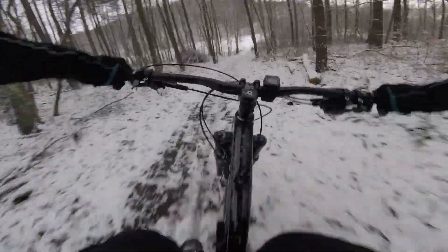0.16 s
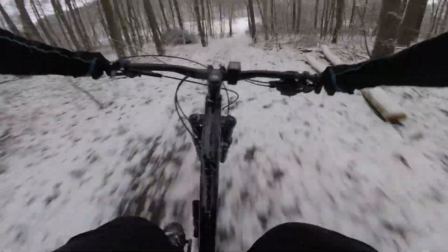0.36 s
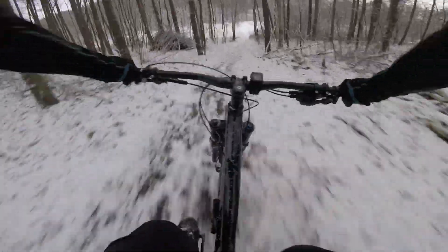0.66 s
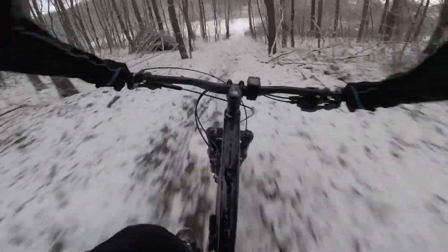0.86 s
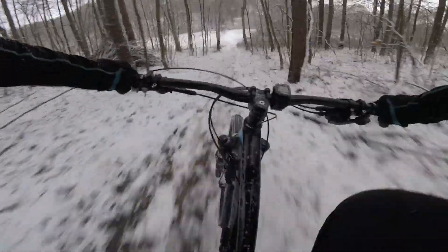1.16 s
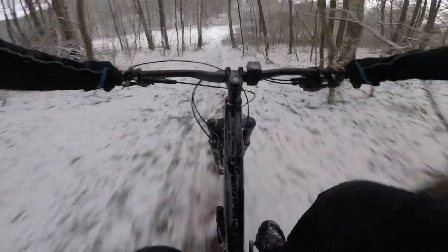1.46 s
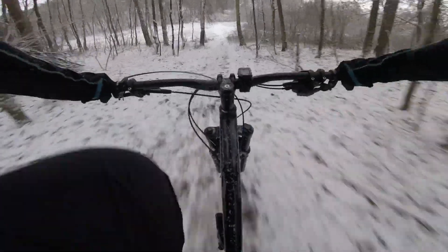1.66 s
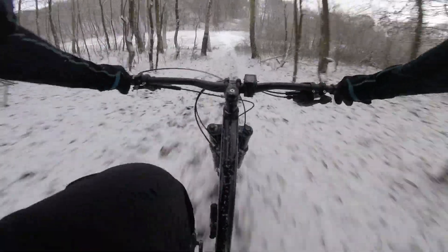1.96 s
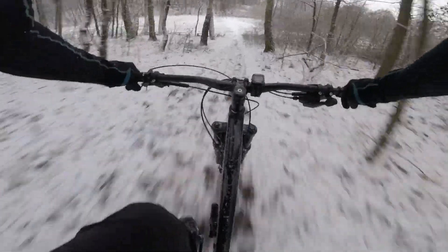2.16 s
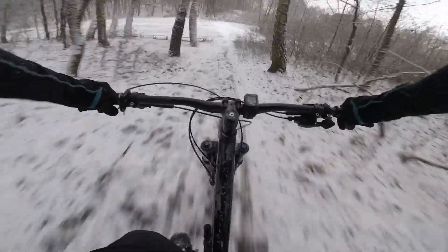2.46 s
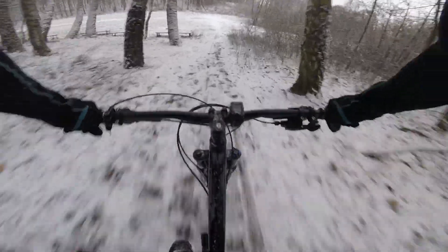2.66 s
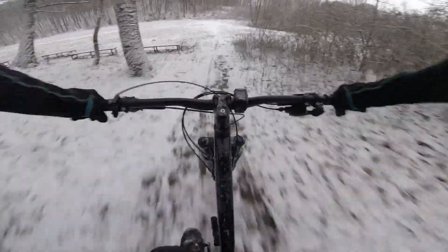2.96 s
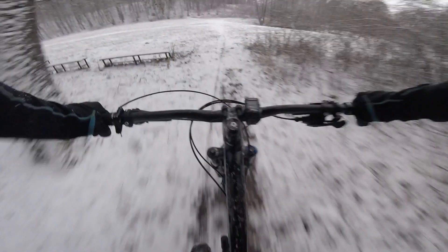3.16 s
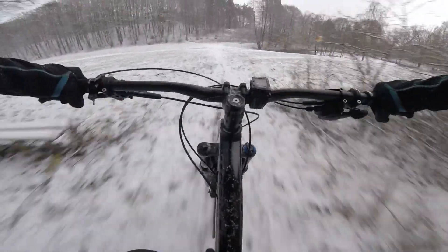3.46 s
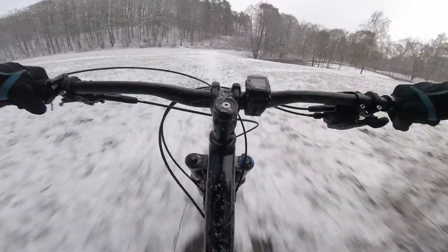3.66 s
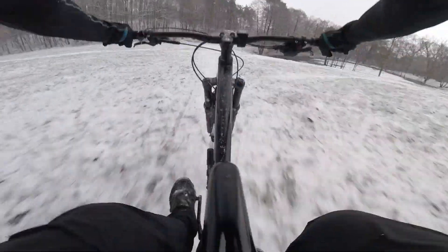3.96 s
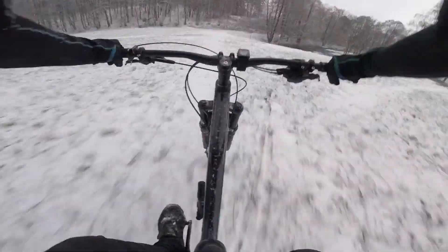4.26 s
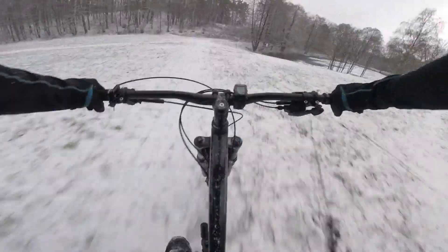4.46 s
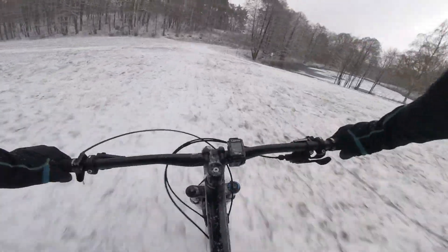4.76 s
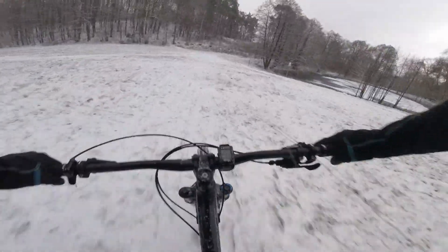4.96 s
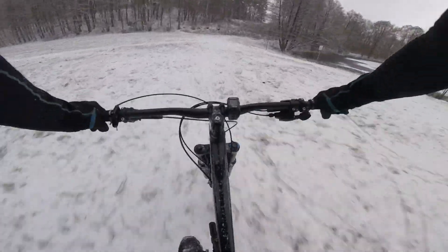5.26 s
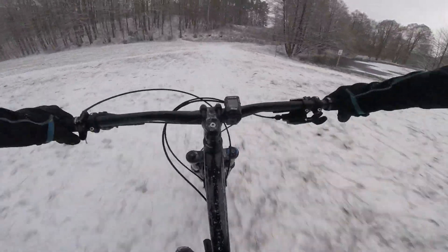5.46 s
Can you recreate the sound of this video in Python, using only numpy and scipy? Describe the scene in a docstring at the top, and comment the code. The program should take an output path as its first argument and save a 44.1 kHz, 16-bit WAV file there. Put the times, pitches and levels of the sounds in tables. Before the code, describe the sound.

Muffled wind buffeting and deep tyre rumble on fast, bumpy snow, with bright chain ticks, dry frame knocks and crackling crust.

```python
"""A mountain bike runs fast down a snowy forest trail, heard from a microphone on the rider's chest.
From the start wind turbulence buffets, tyres rumble and crunch (shaped noise and random grains), and
chain and cables tick (struck resonances near 6.5 kHz). Soon crust crackles, the frame knocks, and single
eddies thump as swings of pressure; from 0.4 s short hollow pops ring low as struck resonances.
Near 1.1, 3.2 and 5.1 s a twig scrapes by stick and slip. The heaviest eddy comes at 2.6 s."""
import sys
import numpy as np
from scipy import signal
from scipy.io import wavfile
from scipy.ndimage import uniform_filter1d

SR = 44100
rng = np.random.default_rng(int(sys.argv[2]) if len(sys.argv) > 2 else 0)


def unload_wav(signal):
    """Save mono or channel-first audio to the path in sys.argv[1] as 16-bit WAV at rate SR, clipped to [-1, 1]."""
    wavfile.write(
        sys.argv[1],
        SR,
        np.round(np.clip(np.atleast_2d(signal).T, -1, 1) * 32767).astype(np.int16),
    )


N = 246959  # length in samples

# Load of the tyres on the trail. Each row: time in seconds, load in dB.
TYRE_LOAD = [(0.0, -17.5), (0.15, -20), (0.48, -20), (1.0, -18.5), (1.65, -16), (1.82, -18), (2.2, -15),
             (2.68, -14), (2.95, -17), (3.1, -18), (3.45, -19.5), (3.96, -22), (4.15, -14.5), (4.4, -15),
             (4.57, -21.5), (4.96, -21), (5.16, -18.5), (5.42, -20), (5.6, -23.5)]
MEAN_LOAD_DB = -18
# Layers that follow the load. Each holds: level at the mean load in dB, slope in dB per dB of load.
WIND_BUFFETING = (-20, .6)
TYRE_RUMBLE = (-20.5, 0.91)
SNOW_CRUNCH = (-47, 0.5)

# Air rushing past the microphone. Each row: time in seconds, level in dB.
AIR_RUSH = [(0, -29), (.4, -34), (1.0, -32.5), (1.65, -31.5), (1.85, -34.5), (2.45, -29.5), (2.78, -28.5),
            (2.87, -31), (3.15, -31), (3.5, -33.5), (3.92, -34), (4.14, -37.5), (4.42, -32), (4.58, -35.5),
            (4.95, -32.5), (5.35, -32.5), (5.6, -36)]
# Passing gusts. Each row: centre in seconds, length in seconds, change of the buffeting in dB.
GUSTS = [(.6, 1, 3.5), (1.504, 0.079, 4), (2.005, 0.25, 3), (2.237, 0.16, -1), (2.738, 0.29, 4),
         (3.134, 0.15, 4.5), (3.762, 0.17, 5.5), (4.173, 0.095, 1), (4.483, .12, 3), (5.374, 0.49, 3)]
# Brief changes of wind, mostly lulls. Each row: centre in seconds, length in seconds, change in dB.
LULLS = [(0.145, 0.068, -2), (0.935, .05, -3.5), (1.12, 0.071, -3.5), (1.23, .04, 2), (2.4, 0.063, -7),
         (2.89, 0.086, -4), (3.36, 0.083, -5), (3.62, 0.051, -7), (3.995, .05, -8), (4.3, 0.068, -2),
         (4.79, 0.064, -1.5), (5.0, .06, -8.5)]
# Spectra of large and small eddies. Each row: frequency in Hz, relative density in dB per Hz.
EDDY_SPECTRUM = [(16, -11), (25, 2.5), (40, -1), (70, -4), (110, -5.5), (170, -14.5), (300, -34.5)]
RUSH_SPECTRUM = [(250, -2.5), (480, 2.5), (650, -1), (1000, -8.5), (1500, -18.5), (2200, -23), (3200, -29),
                 (4500, -59.5)]
RUSH_JOLT_SHARE = 0.44  # share of a jolt, in dB, that the rush of air takes on
MUFFLE_HZ = 3620  # low-pass for wind, rolling and low pops

# Bumps that press the bike down. Each row: centre in seconds, change of the rumble in dB.
BUMPS = [(.07, 4), (.15, 3.5), (0.224, 5.5), (.3, -0.5), (.375, 5), (.631, 6.5), (.78, 3.5), (1.006, 7.5),
         (1.23, 1), (1.32, 2.5), (1.75, 3), (2.3, -1.5), (2.72, 2.5), (2.79, 1), (3.125, 5.5), (3.18, 2),
         (3.306, 3.5), (3.66, 4), (3.77, 6.5), (4.2, 1), (4.39, 4), (4.73, 5), (5.149, 4), (5.28, 2)]
# hump length; time from the bump to the smaller opposite hump that follows it; relative size of that hump
BUMP_S, REBOUND_S, REBOUND_SHARE = 0.084, 0.063, 0.23
# Brief losses of grip. Each row: centre in seconds, length in seconds, change of the rumble in dB.
SKIPS = [(.425, 0.027, -2.5), (0.693, .04, -4), (1.82, 0.11, -2), (2.83, .04, -1.5), (3.263, .035, -6.5),
         (3.888, 0.062, -6), (4.275, 0.018, -7)]
# Ground hardness. Each row: time in seconds, hardness on a scale where a step is 1.7 dB of roar over thud.
GROUND_HARDNESS = [(0, 2.5), (.65, 1), (1.25, 6.5), (1.9, -1), (2.5, 5.5), (3.1, -2), (3.5, 1), (4.0, -1.5),
                   (4.3, 0), (4.7, -2), (5.35, 3), (5.6, 5)]
BUMP_DEEPENING = 0.36  # hardness lost per dB of jolt
# Spectra on soft and hard ground. Each row: frequency in Hz, relative density in dB per Hz.
THUD_SPECTRUM = [(60, -2), (110, -5), (190, -0.5), (260, -5.5), (360, -21.5), (600, -43.5)]
ROAR_SPECTRUM = [(180, -6), (260, -2), (360, -2.5), (500, -10.5), (720, -28), (1400, -64)]

# Loose snow thrown against the bike. Each row: time in seconds, spray level in dB.
SNOW_SPRAY = [(0, -39), (.09, -51), (.2, -47), (.45, -56), (.9, -53.5), (1.22, -51), (1.6, -53.5),
              (3.1, -51), (3.21, -50), (3.3, -53.5), (3.6, -55.5), (4.1, -58), (4.46, -54.5), (4.8, -54),
              (5.6, -56)]
# Spectrum of packing snow. Each row: frequency in Hz, relative density in dB per Hz.
CRUNCH_SPECTRUM = [(900, 6.5), (1500, 10), (2200, -3.5), (3000, -6), (4000, -16.5), (5500, -28),
                   (8000, -33), (11000, -56)]
# Spray through the microphone port. Each row: frequency in Hz, bandwidth in Hz, relative level in dB.
SPRAY_MODES = [(4990, 330, -7.5), (6560, 340, 2), (6700, 380, -29.5), (7160, 480, -15.5),
               (8660, 800, -32.5)]
SPRAY_MIST = 0.25  # even powder among the grains

# Stretches of frozen lumps. Each row: centre in seconds, length in seconds, level in dB.
FROZEN_CLODS = [(0.168, 0.26, -34), (1.575, 0.18, -28), (2.597, 0.29, -30), (2.769, 0.076, -21.5),
                (2.92, 0.063, -25), (3.158, 0.11, -27.5), (3.354, 0.042, -24.5), (4.14, 0.17, -27.5),
                (4.406, 0.19, -31), (5.14, 0.061, -51), (5.374, 0.46, -31.5)]
# Spectrum of the bursting lumps. Each row: frequency in Hz, relative density in dB per Hz.
CLOD_SPECTRUM = [(380, 3.5), (600, 4), (900, -7), (1400, -15), (2200, -26.5), (3200, -38.5)]
CLODS_PER_S = 830

# Loudest chain and cable ticks. Each row: start in seconds, strength of the ring in dB,
# ring frequency in Hz, body relative to ring in dB, bounce time of the contact in seconds.
LOUD_TICKS = [(0.0605, -23, 6700, -14, 0.0005), (0.1144, -22.5, 6600, -16, 0.00019),
              (0.15, -28.7, 6430, -24, 0.0018), (0.2013, -35, 6440, -20, 0.0015),
              (0.2549, -31.5, 6400, -6.5, 0.0018), (0.3456, -39.5, 6600, -8, 0.0003),
              (0.3965, -31, 6550, -12, 0.0018), (0.4524, -30.5, 6600, -14, 0.00096),
              (0.4962, -34, 6300, -9, 0.00032), (0.5259, -42.8, 6600, -12, 0.00023),
              (0.5788, -25.9, 6520, -14, 0.00071), (0.6399, -32.8, 6470, -17, 0.0002),
              (0.739, -36.5, 6540, -6, 0.0002), (0.8173, -40, 6500, -19, 0.0002),
              (0.8719, -30, 6500, -20, 0.0002), (0.9774, -30, 6360, -9, 0.00022),
              (1.0416, -28, 6400, -15, 0.00022), (1.0449, -25.9, 6470, -19, 0.00065),
              (1.1594, -31, 6500, -14, 0.0005), (1.1758, -27, 6770, -14, 0.00096),
              (1.1812, -33, 6350, -20, 0.0002), (1.2414, -41, 6340, -7, 0.0006),
              (1.2646, -35, 6470, -13, 0.00045), (1.2697, -36, 6500, -22, 0.00017),
              (1.3433, -34, 6630, -11, 0.0011), (1.413, -31, 6500, -8, 0.0015),
              (1.6313, -33.5, 6560, -13, 0.002), (1.868, -18, 6450, -19, 0.00099),
              (1.9293, -36.5, 6370, -15, 0.0002), (1.9952, -21.9, 6500, -15.5, 0.00035),
              (2.3565, -36, 6440, -14, 0.00023), (2.3917, -29.5, 6400, -11, 0.0009),
              (2.4009, -34, 6500, -7, 0.0008), (2.5181, -33.5, 6460, -14, 0.0024),
              (2.6356, -35.2, 6440, -14, 0.0018), (2.7791, -36, 6490, -13, 0.001),
              (2.8432, -41, 6700, -6, 0.0015), (2.916, -33, 6590, -13, 0.0011),
              (3.0037, -37, 6300, -12, 0.00045), (3.0245, -31.5, 6570, -18, 0.0018),
              (3.0966, -37.7, 6500, -13, 0.0014), (3.1338, -36, 6490, -20, 0.00018),
              (3.1535, -30.7, 6560, -11, 0.0006), (3.1862, -27.5, 6530, -18, 0.001),
              (3.2202, -36, 6760, -10, 0.00044), (3.2656, -42, 6600, -20, 0.0005),
              (3.997, -31, 6700, -15, 0.0005), (4.009, -38.0, 6420, -13, 0.0004),
              (4.0394, -45.7, 6950, -12, 0.0003), (4.0854, -41, 6360, -8, 0.00033),
              (4.129, -41.9, 6680, -11, 0.0002), (4.2023, -41, 6700, -10, 0.0002),
              (4.2781, -45, 6810, -10, 0.0008), (4.3068, -42, 6600, -4, 0.0009),
              (4.3494, -26.3, 6680, -20, 0.0002), (4.392, -35, 6570, -15, 0.0003),
              (4.4007, -38.9, 6450, -9, 0.0002), (4.4177, -27, 6520, -12.5, 0.0017),
              (4.4382, -40, 6450, -9, 0.001), (4.489, -28.2, 6600, -20, 0.0005),
              (4.5295, -29, 6500, -16, 0.0015), (4.567, -34, 6330, -6.5, 0.0018),
              (4.6041, -35.5, 6510, -9, 0.001), (4.72, -38.1, 6560, -24, 0.001),
              (4.7856, -25.5, 6610, -20, 0.0014), (4.9743, -39, 6700, -11, 0.00024),
              (4.9878, -36, 6620, -8, 0.0008), (5.0135, -48, 6450, -8, 0.00022),
              (5.0422, -41.9, 6650, -2, 0.00097), (5.1181, -25.5, 6570, -14, 0.00083),
              (5.1524, -39.4, 6620, -17, 0.0004), (5.1761, -30.5, 6500, -20, 0.0015),
              (5.2482, -31.1, 6550, -14, 0.0019), (5.3056, -41.6, 6620, -14, 0.001),
              (5.4517, -24.5, 6520, -14, 0.0003), (5.5181, -37.5, 6330, -9, 0.00054),
              (5.5485, -36.5, 6310, -11, 0.0006)]
# Ring of a tick. Each row: nominal frequency in Hz, bandwidth in Hz, nominal relative strength in dB.
TICK_MODES = [(5270, 450, -15.5), (6550, 167, 9), (7000, 600, -5), (7630, 190, -9), (9250, 1200, -15)]
TICK_SCATTER_HZ, TICK_SCATTER_DB = 170, 2.8  # standard deviations
# Duller body of a tick. Each row: frequency in Hz, bandwidth in Hz, relative peak in dB.
TICK_BODY_MODES = [(3210, 440, 2.5), (3800, 450, -5), (5170, 290, -6.5)]
FAINT_TICKS_PER_S, FAINT_TICK_DB, FAINT_TICK_SPREAD_DB = 22, -46.5, 4
FAINT_TICK_HZ, FAINT_TICK_SPREAD_HZ = 6550, 150
FAINT_BODY_DB, FAINT_BODY_SPREAD_DB, FAINT_BOUNCE_S = -8.5, 5, 0.00048

# Patches of icy crust and twigs. Each row: start in seconds, decay length in seconds, level in dB.
CRUST_PATCHES = [(0.129, 0.19, -49), (1.018, 0.079, -48), (2.447, 0.45, -62), (2.754, 0.022, -44),
                 (2.899, 0.11, -52), (3.157, 0.08, -47), (3.209, 0.052, -49.5), (4.397, 0.081, -56),
                 (4.964, 0.12, -55), (5.113, 0.12, -53.5)]
CRUMBS_PER_S = 700  # at the start of a patch
# Frame knocks. Each row: start in seconds, strength in dB, ring in Hz, bounce time in seconds.
FRAME_KNOCKS = [(0.1483, -26.1, 2130, 0.0011), (0.206, -33.6, 1750, 0.0011), (0.3176, -38, 3900, 0.00055),
                (0.8583, -38, 3360, 0.0016), (0.97, -30, 1750, 0.0016), (1.0206, -33, 1750, 0.0011),
                (1.026, -32.7, 1750, 0.0018), (1.0311, -35.0, 1840, 0.0008), (1.0397, -32.5, 1750, 0.0015),
                (1.049, -32, 1790, 0.0004), (1.0895, -31, 1750, 0.0019), (1.0959, -37, 1810, 0.0018),
                (1.8527, -32, 2000, 0.0012), (2.4859, -39, 2270, 0.0013), (2.691, -34, 2030, 0.0014),
                (2.7587, -35, 2070, 0.0018), (2.904, -37, 1780, 0.001), (2.958, -35, 1790, 0.0002),
                (2.976, -36, 1750, 0.0012), (2.985, -31, 1950, 0.0002), (3.0042, -31.5, 1810, 0.0006),
                (3.1116, -36, 1750, 0.0005), (3.1856, -27.5, 2350, 0.0008), (3.23, -34, 1980, 0.0005),
                (3.2373, -29.5, 2110, 0.002), (3.7239, -30.5, 1980, 0.00035), (4.8153, -33.5, 1810, 0.001),
                (4.9729, -41, 2140, 0.0003), (4.9804, -38, 1820, 0.0007), (5.012, -28, 1830, 0.00068),
                (5.117, -33, 2660, 0.0009), (5.187, -39, 2460, 0.0003), (5.2155, -37, 2360, 0.00055),
                (5.2766, -34, 1930, 0.00054), (5.4507, -32.5, 1850, 0.0013), (5.5178, -30.0, 2010, 0.00023),
                (5.5477, -33.1, 2390, 0.0004)]
# Ring shared by all knocks. Each row: frequency in Hz, bandwidth in Hz, relative peak in dB.
KNOCK_MODES = [(3280, 1300, -15.5), (3660, 700, -31), (5500, 440, -21.5), (6500, 720, -13.5)]
# Single eddies. Each row: centre in seconds, peak in dB.
SINGLE_EDDIES = [(.222, -12), (0.363, -8), (.373, -13), (0.614, -11), (.629, -11), (.648, -6), (1.656, -8),
                 (1.9, -8.5), (2.275, -5), (2.644, 0.5), (2.677, -8), (3.035, -10), (3.05, -5), (3.12, -4),
                 (3.17, -4.5), (3.18, -9), (3.303, -4), (4.175, -7), (4.357, -11), (4.387, -6.5),
                 (4.402, -6.5), (5.153, -8.5)]
EDDY_HZ = 175  # the pulse spectrum is strongest here
# Short hollow low pops among the wind and rolling noise. Each row: start in seconds, peak in dB.
LOW_POPS = [(.443, -17), (0.685, -21), (0.726, -23), (1.484, -19), (1.898, -20), (2.114, -30), (2.514, -16),
            (2.52, -16), (2.533, -18), (2.598, -10), (2.705, -20), (2.727, -16), (2.755, -12.5),
            (2.79, -13), (3.117, -18), (3.297, -19), (3.324, -23), (4.073, -20.5), (4.293, -28),
            (4.31, -21), (4.346, -17), (4.394, -16.5), (4.981, -16), (5.11, -21), (5.151, -23),
            (5.3, -16.5)]
POP_HZ, POP_SCATTER = 613, 0.22  # mean pitch and its relative standard deviation
# Twigs along the bike. Each row: start in seconds, decay length in seconds, first peak in dB.
TWIG_SCRAPES = [(1.091, .04, -32), (3.196, 0.057, -38), (5.055, 0.066, -37)]
# Ring of a scraping twig. Each row: frequency in Hz, bandwidth in Hz, relative peak in dB.
SCRAPE_MODES = [(3900, 550, 2.5), (5200, 610, 3), (6500, 550, 9)]
SLIP_S = 0.0066  # mean time between slips
CUTOFF_HZ = 12500  # upper limit of the whole sound


def from_db(db):
    """Logarithmic level: twenty decibels are a factor of ten in amplitude."""
    return 10 ** (np.asarray(db) / 20)


def rms_one(x):
    """Mean power: scale a signal to rms 1."""
    return x / np.sqrt(np.mean(x ** 2) + 1e-20)


def peak_one(x):
    """Peak amplitude: scale a signal to peak 1."""
    return x / np.abs(x).max()


def strength_one(x):
    """Impulse energy: scale a blow to the energy of a 4 ms tone of height 1."""
    return x * np.sqrt(.002 * SR) / np.linalg.norm(x)


def in_time(rows):
    """Linear interpolation: one curve per column, sample by sample."""
    seconds, *columns = np.transpose(rows)
    return [np.interp(np.arange(N) / SR, seconds, column) for column in columns]


def swell(s, length_s):
    """Gaussian envelope: a smooth hump of height 1 around a time."""
    return np.exp(-(2 * (np.arange(N) / SR - s) / length_s) ** 2)


def add(out, s, sound):
    """Superposition: mix a short sound in at a time."""
    at = max(round(s * SR), 0)
    out[at:at + len(sound)] += sound[:max(N - at, 0)]


def butter(x, hz, kind, order=2):
    """Causal Butterworth filtering: a maximally flat passband."""
    sections = signal.butter(order, np.clip(hz, 8, .45 * SR), kind, fs=SR, output="sos")
    return signal.sosfilt(sections, x)


def drift(rate):
    """Low-passed noise: smooth chance of spread 1 that changes about rate times a second."""
    r = np.exp(-40 * np.pi * rate / SR)
    # made at a twentieth of the sample rate; the filter's run-in is dropped
    slow = signal.lfilter([1], [1, -2 * r, r * r], rng.standard_normal(N // 20 + 2002))[2000:]
    return np.interp(np.arange(N) / 20, np.arange(len(slow)), rms_one(slow))


def resonate(x, modes):
    """Modal superposition: parallel damped resonances with alternating signs."""
    out = 0
    for k, (hz, width, db) in enumerate(modes):
        r = np.exp(-np.pi * width / SR)
        zeros = [(1 - r * r) / 2, 0, -(1 - r * r) / 2]
        poles = [1, -2 * r * np.cos(2 * np.pi * hz / SR), r * r]
        out = out + (-1) ** k * from_db(db) * signal.lfilter(zeros, poles, x)
    return out


def coloured(source, spectrum):
    """Spectral shaping: half-octave bands, dealt in turn from two draws, follow a spectrum; rms 1."""
    hz, db = np.transpose(spectrum)
    draws, out = [source(), source()], 0
    centres = hz[0] * 2 ** np.arange(0, np.log2(hz[-1] / hz[0]), .5)
    for k, centre in enumerate(centres):
        edges = centre * np.sqrt(2) ** np.array([-.5, .5])
        level_db = np.interp(np.log(centre), np.log(hz), db)
        out = out + from_db(level_db) * butter(draws[k % 2], edges, "band")
    return rms_one(out)


def white():
    """White noise: equal mean power at all frequencies."""
    return rng.standard_normal(N)


def steady(x, seconds):
    """Running power normalisation: slow swells even out and only fast lumps remain."""
    return x / np.sqrt(uniform_filter1d(x * x, max(int(seconds * SR), 2)) + 1e-9)


def grains(per_s, spread_db):
    """Random impulses: snow crystals break by chance; with a spread, a few are much harder."""
    born = rng.random(N) < per_s / SR
    sizes_db = spread_db * np.minimum(rng.exponential(1, N), 4)
    return born * from_db(sizes_db) * rng.choice([-1, 1], N) + 1e-18


def contact(bounce_db, bounce_s, tail_db, tail_s):
    """Impact excitation: one clean blow, quick bounces, then a faint chatter that dies away."""
    t = np.arange(SR // 20) / SR
    bounces = rng.standard_normal(len(t)) * t * np.exp(-t / bounce_s)
    chatter = rng.standard_normal(len(t)) * np.exp(-t / tail_s)
    bounces = from_db(bounce_db) * bounces / np.linalg.norm(bounces)
    chatter = from_db(tail_db) * chatter / np.linalg.norm(chatter)
    return (t == 0) + bounces + chatter


def follow(layer, load_db):
    """Power law: the level of a layer in dB is linear in the load in dB."""
    db, slope = layer
    return db + slope * (load_db - MEAN_LOAD_DB)


def wind(buffet_db, rush_db):
    """Turbulence: big eddies thump on the microphone; small ones rush past in quick flurries."""
    eddies = steady(coloured(white, EDDY_SPECTRUM), seconds=0.049)
    flurries = from_db(2.35 * drift(45))
    rush = steady(coloured(white, RUSH_SPECTRUM), seconds=0.043) * flurries
    return from_db(buffet_db) * eddies + from_db(rush_db) * rush


def jolts():
    """Load transfer: bumps press the tyres, then let them go light, as does a skip; in dB."""
    out = 0
    for s, db in BUMPS:
        out = out + db * (swell(s, BUMP_S) - REBOUND_SHARE * swell(s + REBOUND_S, BUMP_S))
    return out + sum(db * swell(s, length_s) for s, length_s, db in SKIPS)


def tyres(rumble_db, hardness):
    """Contact stiffness: soft snow gives a deep thud, frozen ground a higher roar."""
    thud = steady(coloured(white, THUD_SPECTRUM), seconds=0.075)
    roar = steady(coloured(white, ROAR_SPECTRUM), seconds=0.042)
    roar_gain = from_db(1.7 * hardness - 4.0)
    rumble = (thud + roar_gain * roar) / np.sqrt(1 + roar_gain ** 2)
    return from_db(rumble_db + 2.0 * drift(40)) * rumble


def snow(crunch_db, spray_db):
    """Granular fracture: snow packs in clumps that crunch and fling fine spray against the bike."""
    clumps = from_db(2.0 * drift(60))
    breaks = grains(per_s=2600, spread_db=3.5)
    crunch = coloured(lambda: breaks + grains(per_s=4600, spread_db=8.5), CRUNCH_SPECTRUM)
    powder = breaks + 2.0 * grains(per_s=700, spread_db=0.0) + SPRAY_MIST * white()
    spray = rms_one(butter(resonate(powder, SPRAY_MODES), 5400, "high", order=4))
    both = clumps * (from_db(crunch_db) * crunch + from_db(spray_db) * spray)
    return butter(both, 9570, "low", order=10)


def clods():
    """Brittle fracture: frozen lumps burst under the knobs in a dense, uneven run of dull cracks."""
    effort = sum(from_db(db) * swell(s, length_s) for s, length_s, db in FROZEN_CLODS)
    cracks = coloured(lambda: grains(per_s=CLODS_PER_S, spread_db=2.5), CLOD_SPECTRUM)
    return effort * steady(cracks, seconds=0.031) * from_db(0.92 * drift(60))


def faint_ticks():
    """Random arrivals: light touches at uneven times, as rows like those of the loud ticks."""
    gap, level, pitch, body = rng.uniform(-1, 1, (220, 4)).T
    times = np.cumsum(1 + gap) / FAINT_TICKS_PER_S
    strength_db = FAINT_TICK_DB + FAINT_TICK_SPREAD_DB * level
    ring_hz = FAINT_TICK_HZ + FAINT_TICK_SPREAD_HZ * pitch
    body_db = FAINT_BODY_DB + FAINT_BODY_SPREAD_DB * body
    bounce_s = np.full(len(times), FAINT_BOUNCE_S)
    rows = np.column_stack([times, strength_db, ring_hz, body_db, bounce_s])
    return rows[times < N / SR]


def chain():
    """Struck modes: links and cables flick against the frame, and a weak rebound follows."""
    out = np.zeros(N)
    for s, db, ring_hz, body_db, bounce_s in [*LOUD_TICKS, *faint_ticks()]:
        modes = np.array(TICK_MODES, float)
        # the modes shift in pitch and strength with the place that is hit; the main one has a set pitch
        modes[:, 0] += TICK_SCATTER_HZ * rng.standard_normal(len(modes))
        modes[np.argmax(modes[:, 2]), 0] = ring_hz
        modes[:, 2] += TICK_SCATTER_DB * rng.standard_normal(len(modes))
        blow, rebound = [contact(bounce_db=5.5, bounce_s=max(bounce_s, .0001), tail_db=-2.0, tail_s=0.0065)
                         for _ in range(2)]
        late = int(rng.uniform(.004, .012) * SR)
        rebound = np.pad(rebound, (late, 0))[:len(blow)]
        touch = blow + from_db(rng.normal(-18.5, 2.4)) * rebound
        ring = 0
        for hz, width, level_db in modes:
            ring = ring + from_db(level_db) * strength_one(resonate(touch, [(hz, width, 0)]))
        ring = butter(ring, 8600, "low", order=7)
        ring = strength_one(butter(ring, 4960, "high", order=3))
        body = resonate(touch, TICK_BODY_MODES)
        body = strength_one(butter(body, [2400, 6000], "band", order=3))
        add(out, s, from_db(db) * (ring + from_db(body_db) * body))
    return out


def crackle():
    """Fracture shower: crust and twigs snap in thinning bursts of crumbs at fourteen pitches."""
    pitches, out = np.geomspace(1700, 5900, num=14), np.zeros(N)
    for s, length_s, db in CRUST_PATCHES:
        t = np.arange(round(2 * length_s * SR)) / SR
        fading = np.exp(-(t / length_s) ** 2)
        shower = 0
        for hz in pitches:
            born = rng.random(len(t)) < CRUMBS_PER_S / len(pitches) * fading / SR
            sizes = from_db(np.clip(rng.normal(0, 4, len(t)), -8, 6)) * rng.choice([-1, 1], len(t))
            # higher crumbs are weaker; all share two upper resonances
            modes = [(hz, 420, -13 * np.log2(hz / pitches[0])), (6500, 450, -11), (8000, 1500, -22)]
            shower = shower + resonate(born * fading * sizes + 1e-18, modes)
        add(out, s, from_db(db) * rms_one(butter(shower, 8200, "low", order=4)))
    return out


def frame():
    """Damped vibration: each blow on the frame gives a short, dry knock."""
    out = np.zeros(N)
    for s, db, hz, bounce_s in FRAME_KNOCKS:
        touch = contact(bounce_db=3.0, bounce_s=max(bounce_s, .0001), tail_db=-2.5, tail_s=.004)
        knock = resonate(touch, [(hz, 600, 0), *KNOCK_MODES])
        add(out, s, from_db(db) * strength_one(butter(knock, 7800, "low", order=6)))
    return out


def buffets():
    """Vortex pressure: a single eddy crosses the microphone as one swing down and up."""
    out = np.zeros(N)
    t = np.arange(-SR // 50, SR // 50) / SR
    phase = 2 * np.pi * EDDY_HZ * t
    swing = phase * np.exp((1 - phase ** 2) / 2)
    for s, db in SINGLE_EDDIES:
        add(out, s + t[0], from_db(db) * swing)
    return out


def low_pops():
    """Damped resonance: a brief excitation rings one broad mode at a random pitch as a hollow pop."""
    out = np.zeros(N)
    for s, db in LOW_POPS:
        hz = POP_HZ * (1 + POP_SCATTER * rng.standard_normal())
        touch = contact(bounce_db=-3, bounce_s=.0008, tail_db=-4, tail_s=.003)
        pop = resonate(touch, [(hz, 500, 0)])
        add(out, s, from_db(db) * peak_one(butter(pop, 1080, "low", order=4)))
    return out


def scrapes():
    """Stick-slip friction: a twig sticks and slips, each slip weaker as it bends away."""
    out = np.zeros(N)
    for s, length_s, db in TWIG_SCRAPES:
        slips = np.cumsum(SLIP_S * rng.uniform(.4, 1.6, 20)) - SLIP_S
        for late in slips[slips < length_s]:
            touch = contact(bounce_db=-2.0, bounce_s=0.00054, tail_db=-4, tail_s=0.0034)
            slip = peak_one(butter(resonate(touch, SCRAPE_MODES), 7500, "low", order=6))
            add(out, s + late, from_db(db) * np.exp(-late / length_s) * slip)
    return out


def scene():
    """Superposition of close sources without echo; tyre load drives buffeting, rumble and crunch."""
    load_db, = in_time(TYRE_LOAD)
    hardness, = in_time(GROUND_HARDNESS)
    rush_db, = in_time(AIR_RUSH)
    spray_db, = in_time(SNOW_SPRAY)
    jolt_db = jolts()
    gust_db = sum(db * swell(s, length_s) for s, length_s, db in GUSTS + LULLS)
    buffet_db = follow(WIND_BUFFETING, load_db) + gust_db
    air = wind(buffet_db, rush_db + RUSH_JOLT_SHARE * jolt_db) + buffets()
    rumble_db = follow(TYRE_RUMBLE, load_db) + jolt_db
    # a pressed tyre thuds more than it roars
    rolling = tyres(rumble_db, hardness - BUMP_DEEPENING * jolt_db) + clods()
    crunching = snow(follow(SNOW_CRUNCH, load_db), spray_db) + crackle() + scrapes()
    muffled = butter(air + rolling + low_pops(), MUFFLE_HZ, "low", order=6)
    return (muffled + crunching + chain() + frame())[None]


def record(dry):
    """Soft saturation and band limiting: the highest peaks are rounded and the top is cut."""
    top = .9  # amplitude that the rounded peaks approach
    rounded = dry / (1 + (dry / top) ** 4) ** (1 / 4)
    return butter(rounded, CUTOFF_HZ, "low", order=12)


dry = scene()
out = record(dry)
unload_wav(out)
```